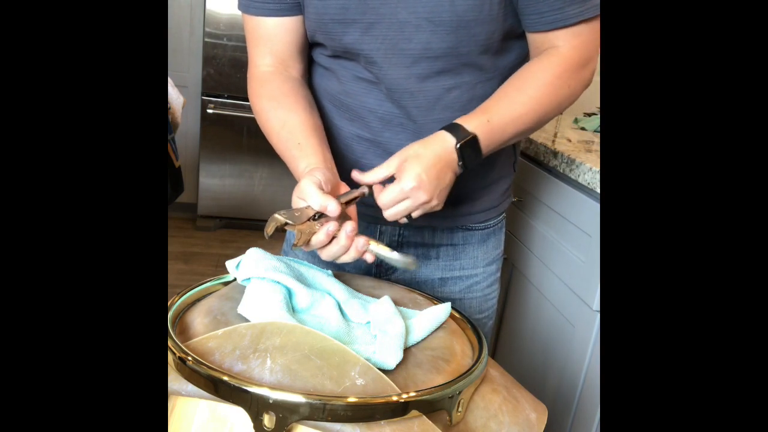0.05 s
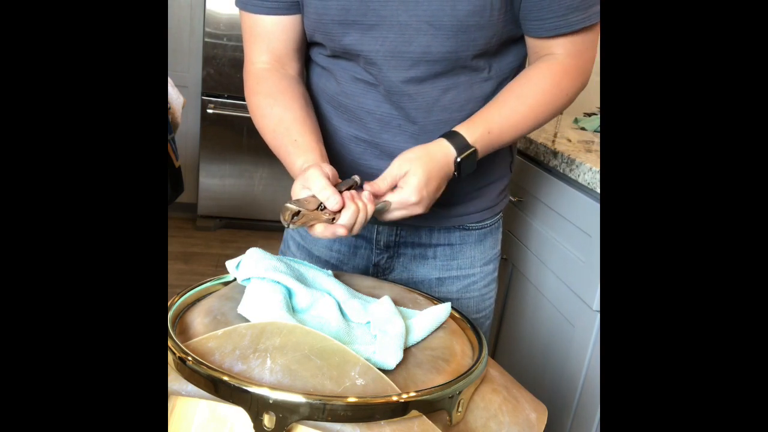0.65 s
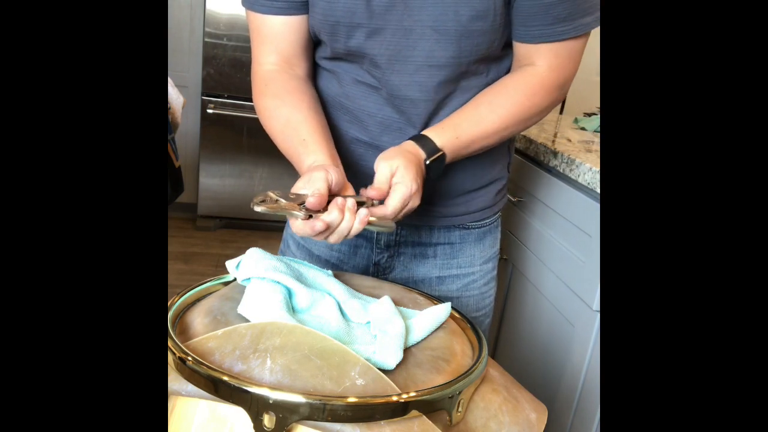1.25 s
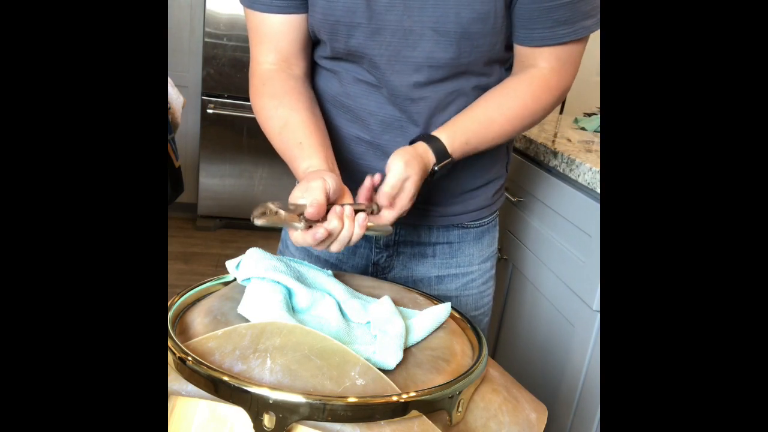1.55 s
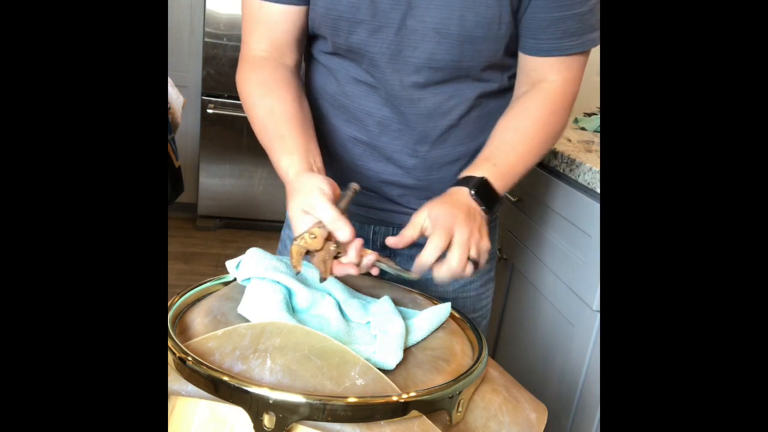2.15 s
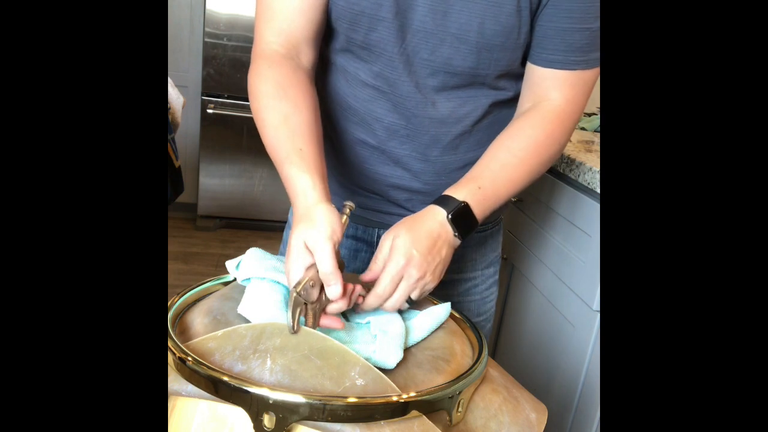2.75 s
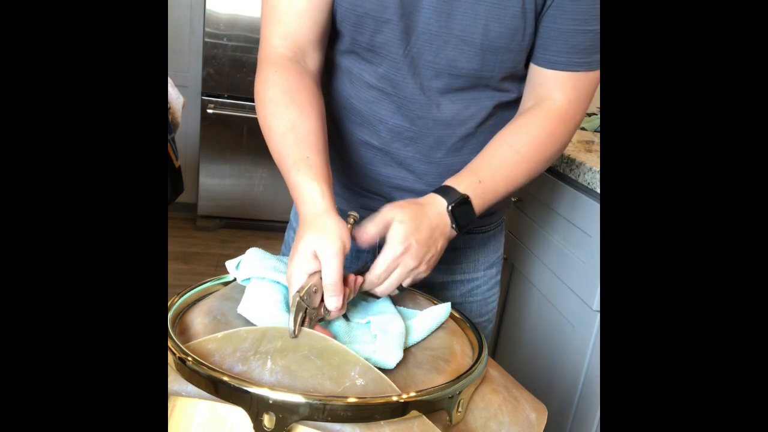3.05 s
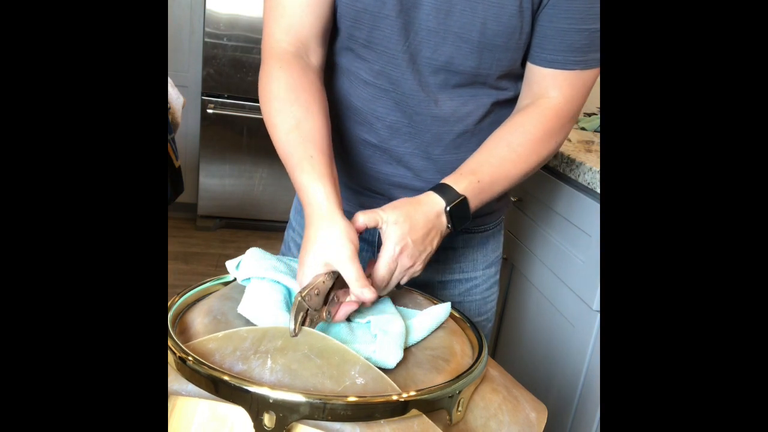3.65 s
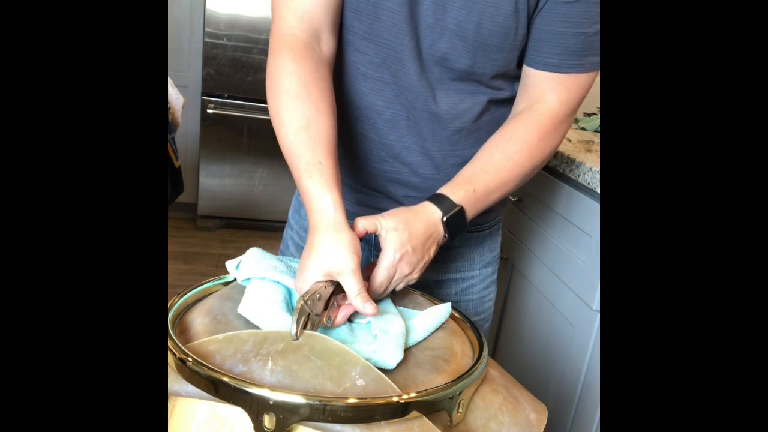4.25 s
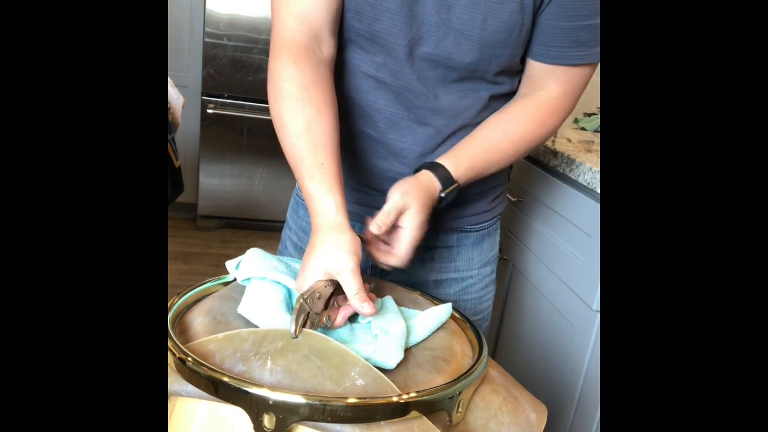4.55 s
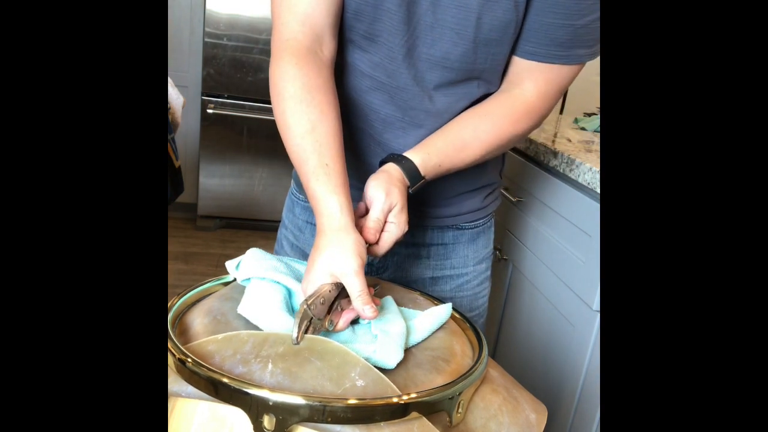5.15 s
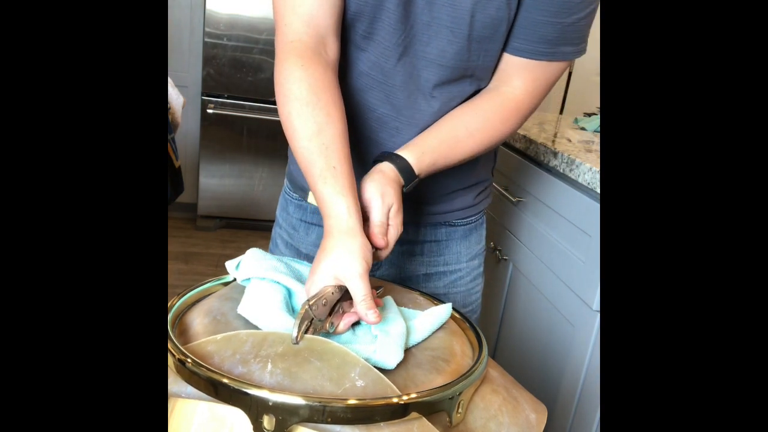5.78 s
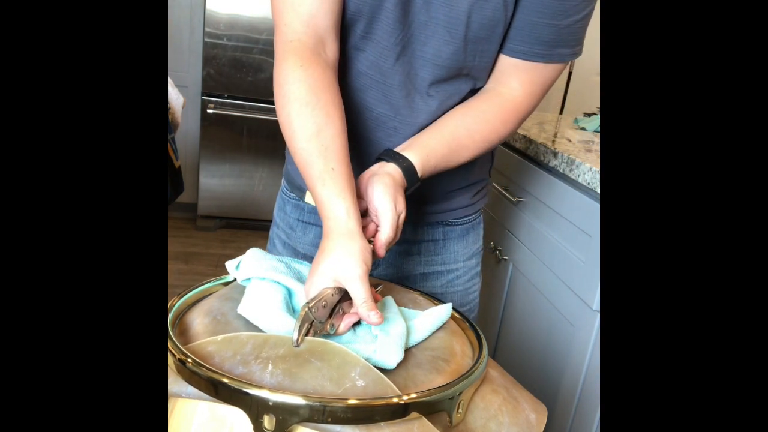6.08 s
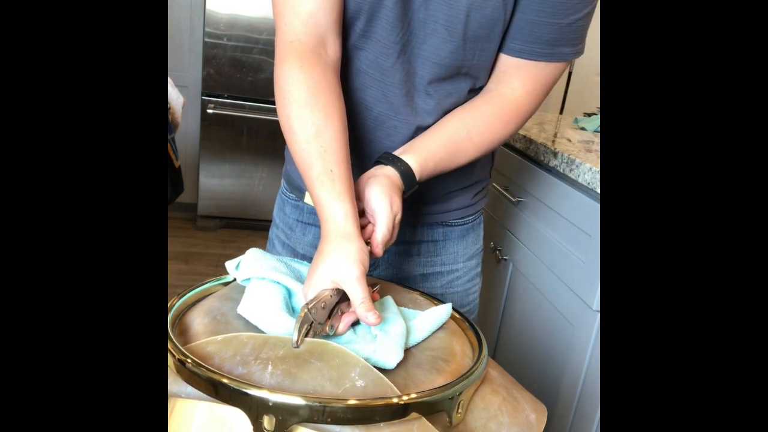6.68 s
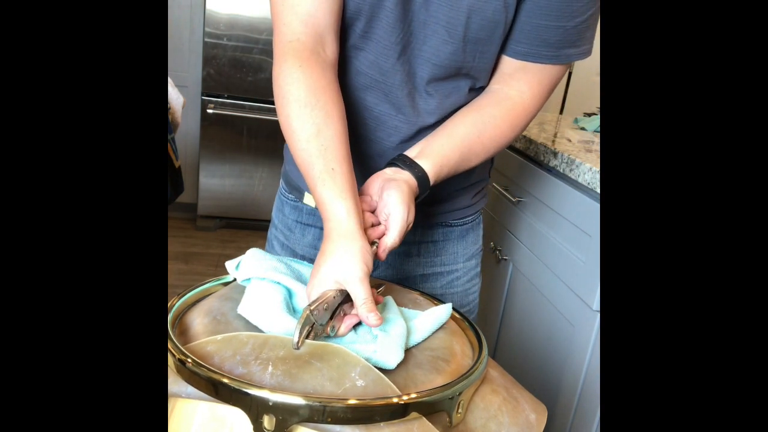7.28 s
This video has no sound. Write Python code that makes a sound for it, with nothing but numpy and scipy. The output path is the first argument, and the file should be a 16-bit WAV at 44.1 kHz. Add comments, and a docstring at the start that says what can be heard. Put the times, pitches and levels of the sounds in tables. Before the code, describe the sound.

A brief metal squeak, one sharp ringing snap and scattered light clicks from locking pliers handled in a quiet kitchen.

```python
"""Steel locking pliers squeeze shut with a dry stick-slip squeak from the pivot, snap open with a loud
ringing clack, and tick as they are shifted in the hand and set against a drum rim. Each steel contact
layers a bright crack, a lower clack and a thin ring, choked by the grip on all but the big snap.
Underneath sits a kitchen bed of refrigerator hum and air; twice something knocks softly further off."""
import sys
import numpy as np
from scipy import signal
from scipy.fft import rfft, irfft, next_fast_len
from scipy.io import wavfile
from scipy.ndimage import map_coordinates

SR = 44100
rng = np.random.default_rng(int(sys.argv[2]) if len(sys.argv) > 2 else 0)


def output_pcm(signal):
    """Save a mono or channel-first signal as 16-bit PCM at the path in sys.argv[1].

    Samples are clipped to [-1, 1] before scaling.
    """
    pcm = np.clip(np.atleast_2d(signal).T, -1, 1) * 32767
    wavfile.write(sys.argv[1], SR, np.round(pcm).astype(np.int16))


N = 322812


def amp(db):
    """Decibels to gain."""
    return 10 ** (np.asarray(db) / 20)


def unit(x):
    """Scale to rms 1."""
    return x / np.sqrt(np.mean(x ** 2) + 1e-20)


def along(points, hz):
    """Read (frequency, value) breakpoints on a log frequency axis."""
    f, values = np.transpose(points)
    return np.interp(np.log(hz + 1), np.log(f), values)


def fade(t, t60):
    """Exponential decay, 60 dB down after t60 seconds."""
    return np.exp(-np.log(1000) * t / t60)


def add(track, start_s, sound):
    """Mix a sound into a track at its cue."""
    part = track[max(round(start_s * SR), 0):][:len(sound)]
    part += sound[:len(part)]


def wobble(rate, size):
    """Smooth random modulation, rate knots a second."""
    knots = rng.standard_normal(int(size * rate / SR) + 4)
    return map_coordinates(knots, [np.arange(size) * rate / SR])


def filtered(x, response):
    """Shape x with a complex frequency response."""
    size = next_fast_len(len(x) + SR // 10)
    hz = np.fft.rfftfreq(size, 1 / SR)
    return irfft(rfft(x, size) * response(hz), size)[:len(x)]


def noise(spectrum, size):
    """Coloured noise of rms 1; the spectrum sets only its tone."""
    return unit(filtered(rng.standard_normal(size), lambda hz: amp(along(spectrum, hz))))


def ring(modes, t, scatter_db, attack_s):
    """Decaying modes, struck at new strengths every time."""
    hz, db, t60 = np.transpose(modes)[:, :, None]
    gains = amp(db + scatter_db * rng.standard_normal(hz.shape))
    partials = gains * fade(t, t60) * np.sin(2 * np.pi * hz * t)
    return np.sum(partials, axis=0) * (1 - np.exp(-t / attack_s))


def room(x, wet_db):
    """A sound plus its own diffuse tail, dying faster in the top end."""
    # reverb time of the kitchen: f/Hz, t60/s
    decay_times = [(200, 0.45), (2500, 0.41), (7000, 0.44), (11000, 0.33), (16000, 0.22)]
    hz, t, spectra = signal.stft(rng.standard_normal(SR // 2), SR, nperseg=256)
    tail = signal.istft(spectra * fade(t, along(decay_times, hz)[:, None]), SR, nperseg=256)[1]
    tail *= 1 - np.exp(-np.arange(len(tail)) / SR / 0.0041)
    return x + amp(wet_db) * signal.fftconvolve(x, tail / np.linalg.norm(tail))[:len(x)]


def refrigerator():
    """A low hum whose partials waver in level and phase."""
    # hum partials: f/Hz, rms level/dB, phase wander/rad
    partials = [(55.8, -65, 0.299), (120, -46, .22), (288.3, -61.5, 0.5), (380.7, -64.5, 0.99),
                (552, -69.5, .9)]
    out, t = np.zeros(N), np.arange(N) / SR
    for hz, db, wander in partials:
        level = np.sqrt(2) * amp(db + 1.297 * wobble(14, N))
        out += level * np.sin(2 * np.pi * hz * t + wander * wobble(12, N))
    return out


def air():
    """Room tone: a gently drifting low rush under a steady hiss."""
    # spectrum of the low rush: f/Hz, relative level/dB
    rush_spectrum = [(20, -21), (35, -21), (50, -11), (75, -12.5), (100, 2.5), (120, 1), (145, -2),
                     (200, -6.5), (280, -5), (400, -10), (520, -11), (720, -16.5), (900, -10.5),
                     (1100, -47)]
    # spectrum of the hiss: f/Hz, relative level/dB
    hiss_spectrum = [(700, -32.5), (950, 4), (1500, 1.5), (2200, -4), (3100, -4), (4300, -11.5),
                     (6000, -15.5), (8000, -25.5), (9700, -29.5), (10400, -36.5), (11200, -34),
                     (15500, -40)]
    # fader ride on the rush: t/s, level/dB
    rush_ride = [(0, -48.5), (.9, -48), (1.08, -51), (2.3, -49.7), (7.32, -50.8)]
    rush_db = np.interp(np.arange(N) / SR, *np.transpose(rush_ride)) + 0.9 * wobble(4, N)
    bed = amp(rush_db) * noise(rush_spectrum, N) + amp(-50.5) * noise(hiss_spectrum, N)
    # standing waves of the room ripple the spectrum
    return filtered(bed, lambda hz: amp(1.7 * map_coordinates(rng.standard_normal(SR), [hz / 22])))


def body(hz):
    """Response of the hand-held pliers to a blow: band-passes of alternating polarity."""
    # damped resonances of the tool: f/Hz, bandwidth/Hz, relative level/dB
    resonances = [(2850, 300, -15), (5450, 420, -12), (6300, 520, -9), (7300, 300, -14), (9150, 420, -10),
                  (9850, 380, -8), (11120, 220, -3), (11850, 560, -5), (13360, 220, 0), (14500, 250, -11),
                  (15100, 300, -11)]
    return sum((-1) ** k * amp(db) * 1j * hz * width / (centre ** 2 - hz ** 2 + 1j * hz * width)
               for k, (centre, width, db) in enumerate(resonances))


def steel_ring(db, damping_t60):
    """The thin ring of the tool, shortened by the hand."""
    # free modes of the steel: f/Hz, relative level/dB, t60/s
    modes = [(2482, -34, .7), (2790, -39, .5), (4337, -33, .45), (5782, -37, .3), (7354, -33, .4),
             (8958, -39, .3), (10782, -15, .12), (11141, -25, .15), (13336, 0, .13), (13275, -17, .1)]
    t = np.arange(SR * 3 // 5) / SR
    free_ring = amp(db) * ring(modes, t, scatter_db=0.5, attack_s=0.0048)
    return room(free_ring * fade(t, damping_t60), wet_db=-14)


def clicks():
    """Each contact is a brief grating crack through the tool, a lower clack and a thin ring."""
    # steel contacts, levels before trim: t/s, crack level/dB, clack level/dB, ring level/dB
    contacts = [(0.0403, -30.5, -41, -49.5), (0.1995, -37, -57, -72), (0.2170, -40, -58, -44),
                (0.2327, -29.5, -39, -49), (0.3018, -18.5, -17, -36), (0.308, -19, -23, -36),
                (0.3273, -19.5, -21.5, -19.5), (0.8586, -27.5, -36, -50), (0.9213, -36.5, -39, -37),
                (1.4240, -44, -56, -59), (1.9470, -49, -25, -66), (1.9926, -25, -19, -43),
                (1.9962, -15.5, -12, -36), (1.9988, -8, -10, -30), (2.0010, -9.5, -10.5, -5),
                (2.1122, -20.5, -24.5, -39), (2.2145, -38.5, -44, -47.5), (2.8242, -40, -37.5, -51),
                (2.9811, -26.5, -34, -30), (4.4620, -25.5, -36, -46), (5.321, -41, -35, -66),
                (5.3247, -41, -34, -66), (5.3460, -24, -34, -48)]
    # spectrum of the lever hitting its stop: f/Hz, relative level/dB
    clack_spectrum = [(200, -35), (1150, -24.5), (1550, -9.5), (2100, -10.5), (2800, -0.5), (3450, -9),
                      (4150, 1.5), (5100, -4.5), (6300, -2.5), (7400, -2), (8200, -14), (12000, -14.5),
                      (16000, -21.5)]
    # a strong ring shakes the tool loose in the hand and lasts longer
    shake_loose_db, loose_t60_s, grip_t60_s = -12, .7, 0.0688
    out, t = np.zeros(N), np.arange(SR * 3 // 5) / SR
    for start_s, crack_db, clack_db, ring_db in contacts:
        # the faces meet hard, then chatter for a few milliseconds
        contact = rng.standard_normal(len(t)) * (fade(t, 0.00229) + amp(-5) * fade(t, .015))
        # body resonances plus a little of the high-passed transient
        bright = filtered(contact, lambda hz: body(hz) + amp(-17.5) * (1j * hz / (4000 + 1j * hz)) ** 2)
        crack = amp(crack_db - 1.5) * bright * np.linalg.norm(contact) / np.linalg.norm(bright)
        clack = amp(clack_db - 4.5) * noise(clack_spectrum, len(t)) * fade(t, 0.014)
        add(out, start_s, room(crack, wet_db=-10) + room(clack, wet_db=-10))
        add(out, start_s, steel_ring(ring_db, loose_t60_s if ring_db > shake_loose_db else grip_t60_s))
    return out


def slip(length_s, pitch_hz, glide, db):
    """One stick-slip squeal: a trembling, gritty tone that builds, holds, then sticks again."""
    # spectrum of the pivot's grating: f/Hz, relative level/dB
    rasp_spectrum = [(1200, -29.5), (2500, -14), (3500, -5.5), (5500, -2.5), (8000, 1.5), (12000, -1),
                     (15000, 1), (16000, -10.5)]
    attack_s, release_t60_s, pitch_tremble, full_strength_db = .003, .012, .006, -15.5
    t = np.arange(SR // 10) / SR
    hz = (pitch_hz + glide * np.minimum(t, length_s)) * (1 + pitch_tremble * wobble(900, len(t)))
    phase = 2 * np.pi * np.cumsum(hz) / SR
    level = amp(db) * np.minimum(t / attack_s, 1) * fade(np.maximum(t - length_s, 0), release_t60_s)
    strength = np.minimum(level / amp(full_strength_db), 1)
    sub, tone, second, third = np.sin(np.outer([.5, 1, 2, 3], phase))
    # overtones grow with strength; a sub-octave breaks out at the top
    partials = amp(-21) * sub * strength ** 4 + (amp(-9.5) * second + amp(-8) * third) * strength
    partials *= amp(2.9 * wobble(500, len(t)))
    rasp = amp(-15.5 + 3 * wobble(700, len(t))) * noise(rasp_spectrum, len(t))
    return level * (np.sqrt(2) * (tone + partials) + rasp)


def squeak():
    """The dry pivot squeals as the handles close, and rings on once it lets go."""
    # slips around two squealing notes: t/s, length/s, f/Hz, glide/(Hz/s), level/dB
    slips = [(.2700, .015, 4850, 14000, -19.5), (.2870, 0.0058, 5310, -4000, -21.5),
             (.2825, 0.0058, 6890, 0.5, -21.5), (.2900, .0115, 6860, 14000, -15.5),
             (.313, 0.0063, 7100, 0, -31.5)]
    # resonances the squeak leaves ringing: f/Hz, relative level/dB, t60/s
    modes = [(4260, -22.5, 0.497), (4990, -18.5, 0.36), (5390, -19, .35), (6940, -2, .45),
             (6935, -6.5, 0.49), (13830, -8, .27), (14010, -10, 0.301)]
    let_go_s, ring_db = .302, -31.5
    out, t = np.zeros(N), np.arange(SR) / SR
    for start_s, length_s, pitch_hz, glide, db in slips:
        add(out, start_s, slip(length_s, pitch_hz, glide, db))
    add(out, let_go_s, amp(ring_db) * ring(modes, t, scatter_db=2, attack_s=.004))
    return room(out, wet_db=-12.5)


def knocks():
    """Distant knocks arrive as a dull tap and a boom of room sound."""
    # soft knocks further off: t/s, tap level/dB, boom level/dB
    cues = [(5.443, -45, -48.5), (5.917, -36, -42)]
    # spectrum of the tap: f/Hz, relative level/dB
    tap_spectrum = [(300, -7), (1000, 5.5), (2000, -12), (2900, -0.5), (4600, -2), (6500, -12), (9000, -33),
                    (16000, -39)]
    # spectrum of the room's boom: f/Hz, relative level/dB
    boom_spectrum = [(150, -17), (450, -7), (750, 1.5), (1300, 4), (2200, -8), (4000, -10), (7000, -37),
                     (16000, -52.5)]
    out, t = np.zeros(N), np.arange(SR) / SR
    for start_s, tap_db, boom_db in cues:
        tap = amp(tap_db) * noise(tap_spectrum, SR) * fade(t, .09) * (1 - np.exp(-t / 0.00084))
        boom = amp(boom_db) * noise(boom_spectrum, SR) * fade(t, 0.86) * (1 - np.exp(-t / 0.01))
        add(out, start_s, room(tap, wet_db=-6.5) + boom)
    return out


def scene():
    """Mono mix: pliers up close, the kitchen behind."""
    return (clicks() + squeak() + knocks() + refrigerator() + air())[None]


def record(dry):
    """A brick-wall low-pass trims the very top."""
    cutoff_hz = 15750
    return np.array([filtered(x, lambda hz: 1 / np.sqrt(1 + (hz / cutoff_hz) ** 200)) for x in dry])


dry = scene()
out = record(dry)
output_pcm(out)
```